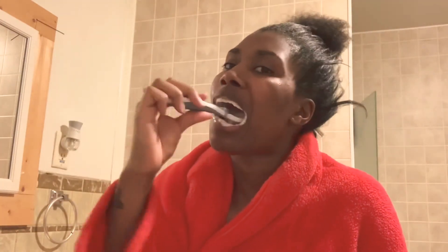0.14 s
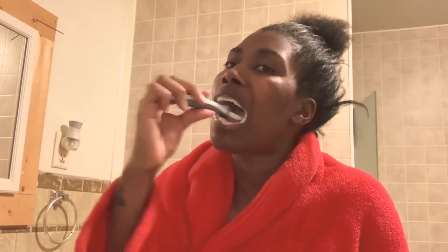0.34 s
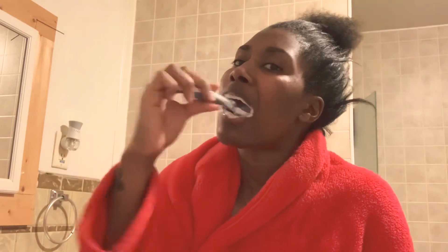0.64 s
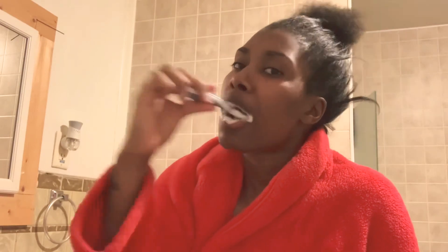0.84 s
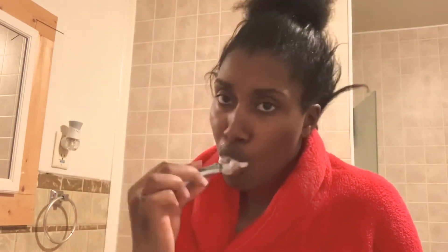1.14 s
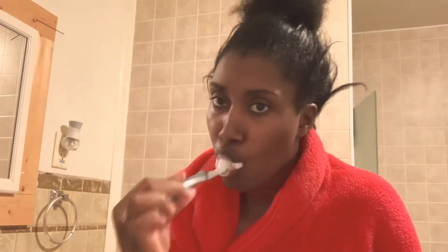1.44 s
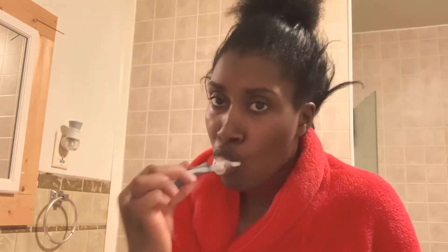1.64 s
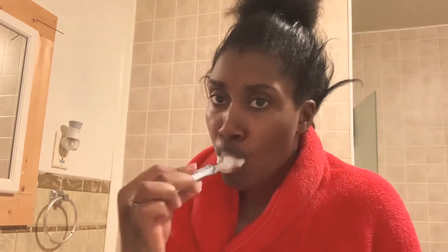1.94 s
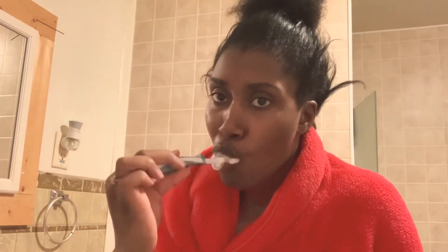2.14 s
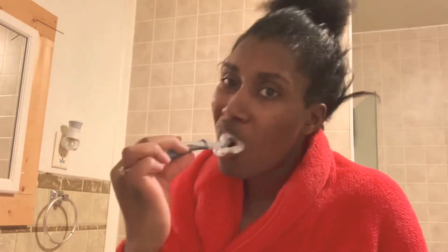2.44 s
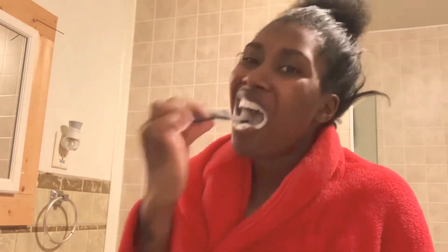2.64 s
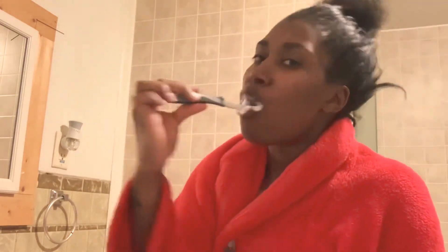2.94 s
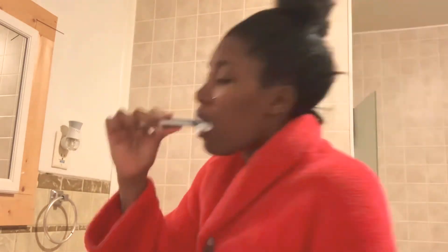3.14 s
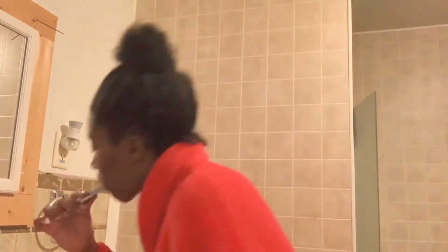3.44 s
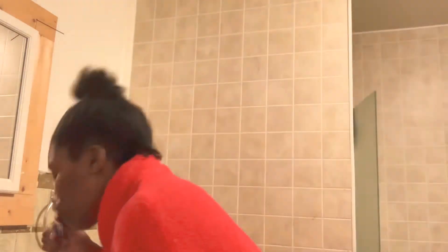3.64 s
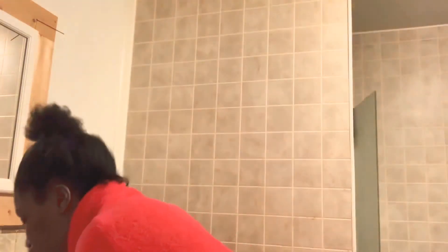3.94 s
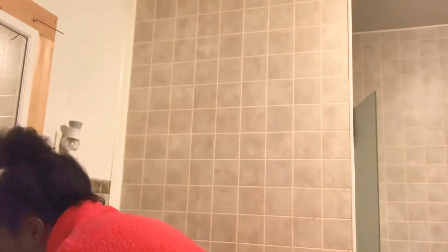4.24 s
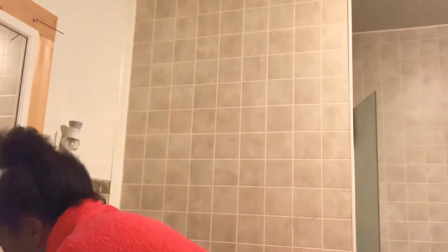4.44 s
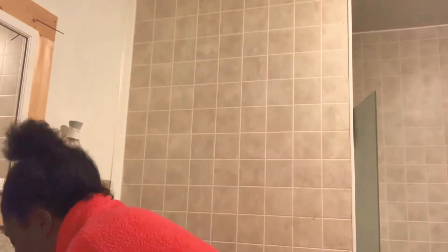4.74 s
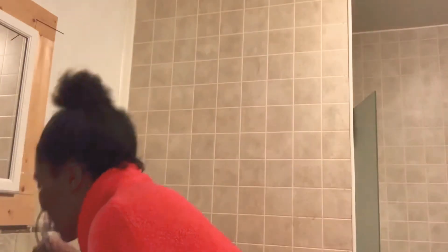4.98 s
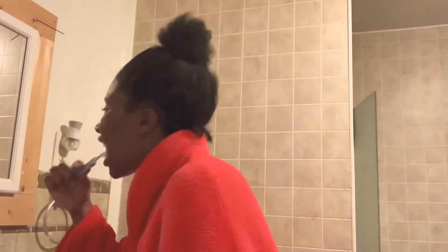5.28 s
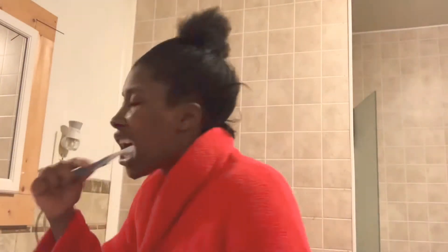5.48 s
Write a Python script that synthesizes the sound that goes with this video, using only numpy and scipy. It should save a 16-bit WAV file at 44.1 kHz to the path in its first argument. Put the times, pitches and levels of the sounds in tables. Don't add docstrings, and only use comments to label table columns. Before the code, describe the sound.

Short wet toothbrush bristle strokes hiss irregularly over a steady humming fan and rushing air in a small tiled bathroom.

```python
import sys
import numpy as np
from scipy import signal
from scipy.fft import rfft, irfft, next_fast_len
from scipy.io import wavfile
from scipy.ndimage import uniform_filter1d

SR = 44100
rng = np.random.default_rng(int(sys.argv[2]) if len(sys.argv) > 2 else 0)


def digitize_waveform(pressure):
    field = np.atleast_2d(pressure).T
    bounded = np.clip(field, -1, 1)
    quanta = np.round(bounded * 32767).astype(np.int16)
    wavfile.write(sys.argv[1], SR, quanta)


def ratio_of_db(decibels):
    return 10 ** (np.asarray(decibels, float) / 20)


N = 247401

HUM_HZ = 239.971
# multiple, left level/dB, right level/dB, left lead/rad
HUM_HARMONICS = [(1, -43.1, -56.1, -.81), (2, -33.1, -36.6, -.35), (3, -50.8, -53.8, -2.68),
                 (4, -58, -54.4, .33)]
# t/s, level/dB
HUM_DRIFT = [
    (0, 0.5),
    (1.5, 0.5),
    (2.7, 0),
    (3.5, 1.1),
    (4.1, 1),
    (5.61, 1.4),
]
# peak t/s, strength over calm/dB, length/s
GUSTS = [(.08, 7, 0.23), (.4, 5, 0.047), (.69, 6, 0.21), (.9, 0, 0.22), (1.234, 7, 0.15), (1.45, 1, 0.19),
         (1.922, 7, 0.16), (2.17, 6, 0.083), (2.45, 2, 0.22), (2.83, 2, 0.072), (3.093, 8.5, 0.21),
         (3.37, 6, 0.055), (3.558, 7, .08), (3.77, 3, 0.088), (4.0, 1.5, 0.17), (4.27, 3, .12),
         (4.53, 2, 0.06), (4.95, -1, .2), (5.258, 3, .15), (5.46, 4, .15)]
# f/Hz, width/Hz, left density/(dB per Hz), right density/(dB per Hz), left lead/rad
ROOM_MODES = [(58, 5, -73, -77, 0), (96, 10, -57, -62.5, 0), (118, 14, -60, -65, 0), (150, 10, -63, -68, 0),
              (182, 10, -64, -68, 0), (296, 30, -67, -68.5, -.3), (355, 16, -66.5, -67.5, -.6),
              (440, 9, -65, -65, 0), (538, 11, -63, -64, -.7),
              (598, 7, -56, -62, -.8), (620, 10, -61, -67, -.6), (667, 8, -64, -59.5, .6),
              (700, 6, -63, -68, -.4), (748, 10, -64, -67, .1), (813, 6, -68, -62, -.1),
              (904, 14, -69, -62.5, -2.2), (991, 20, -66, -63, 2.8), (1061, 25, -64.5, -66, -1.8),
              (1105, 30, -63.5, -69, -.2), (1192, 22, -66, -65, 1.),
              (1278, 20, -68, -69, -.5), (1389, 45, -66, -67, -1.6), (1491, 25, -69, -63.5, -2.4),
                 (1548, 16, -69, -66, -1.2), (1631, 22, -68.5, -68, 0), (1700, 45, -68.5, -67, -1),
                 (1819, 16, -65, -60.5, 1.8), (1976, 29, -70, -70, -1), (2229, 11, -62.5, -64.5, -3.),
                 (2355, 20, -69, -68.5, -.3), (2590, 40, -71, -71, -2.8), (1430, 30, -67, -68, -.5),
                 (1755, 30, -68, -68, -.3), (3230, 30, -72, -72, 0)]
# f/Hz, density/(dB per Hz)
RUSH = [(45, -69), (95, -82), (170, -75.5), (230, -71.5), (450, -68), (800, -70), (1700, -73.5),
        (2300, -72.5), (3200, -75.5), (5000, -80.5), (7000, -81.5), (11000, -82.5),
        (13000, -81), (14500, -80), (15800, -81)]
# f/Hz, correlation (-1..1)
RUSH_CORRELATION = [(40, 0.9), (100, 1), (400, 0.48), (700, 0.97), (1000, -0.59), (2000, -0.32),
                    (3000, -0.36), (5000, 0.0018), (12000, 0.037)]
# f/Hz, left minus right/dB
RUSH_PAN = [(40, 3), (250, 1), (600, 6), (1400, -3), (4000, 1), (9000, -0.1), (15000, 1)]
RUSH_GUST_SHARE = 0.027
# t/s, peak level/dB, length/s, dullness/dB
SCRUBS = [(0.068, -23, 0.052, 0), (0.128, -27, 0.038, 6), (0.368, -30, 0.022, -3), (0.616, -30.5, 0.047, 8),
          (0.741, -34, 0.033, -8), (0.812, -22.5, 0.029, -6), (1.203, -23.5, 0.03, 4),
          (1.282, -24.5, 0.04, 11), (1.708, -24.5, 0.046, 5), (1.906, -32, 0.033, 0.0),
          (1.958, -41, 0.033, -4), (2.137, -41, 0.027, -4), (2.256, -36, 0.03, -3),
          (2.5323, -19.5, 0.038, 1), (2.847, -31, 0.032, 13), (2.923, -33, 0.03, 5),
          (3.066, -22, 0.051, -5), (3.551, -31.5, 0.037, 9), (4.1455, -21, 0.037, -8),
          (4.2454, -22, 0.031, 0), (4.34, -35, 0.036, 1), (4.493, -26.5, 0.02, 2), (4.7546, -18, 0.039, 3),
          (5.109, -28.5, 0.029, 7), (5.275, -28.5, 0.03, 5), (5.3086, -15.5, 0.043, 4.5)]
# f/Hz, density/(dB per Hz)
BRISTLE = [(800, -25), (1900, -5.5), (2600, -4.5), (3500, 0), (4600, 1), (5800, -3), (8000, -3),
           (13000, -4), (15700, -10)]
FIZZ_DB, FIZZ_LOSS_PER_DULL_DB = -3, 3.5
MOUTH_HZ, MOUTH_DROP_HZ_PER_DULL_DB = 4840, 28
# f/Hz, t60/s
TILES = [(500, 0.95), (2000, 0.35), (4000, 0.29), (8000, 0.21), (15000, 0.37)]
# f/Hz, level/dB
BASS_CUT = [(20, -38), (36, -26), (48, -11), (70, -5), (90, 0)]
# f/Hz, level/dB
CENTRE_LOSS = [(11000, -0.5), (13000, -1.5), (14000, -5), (15000, -2)]
CENTRE_EDGE_HZ, EDGE_FLUTTER_HZ = 15000, 450


def evened(x):
    return x / np.sqrt(np.mean(x ** 2) + 1e-20)


def smooth_noise(shape, *widths):
    x = rng.standard_normal(shape)
    for width in widths:
        x = uniform_filter1d(x, size=width)
    return evened(x)


def read(points, hz):
    f, value = np.transpose(points)
    return np.interp(np.log(hz + 1), np.log(f + 1), value)


def white(size):
    return rfft(rng.standard_normal(size)) * np.sqrt(SR / 2)


def hum(waver_db=0.52, waver_rad=0.16, waver_hz=1.41):
    t = np.arange(N) / SR
    beat = np.sin(2 * np.pi * waver_hz * t + 0.43)
    out = np.zeros((2, N))
    for k, left_db, right_db, lead_rad in HUM_HARMONICS:
        phase = k * (2 * np.pi * HUM_HZ * t + waver_rad * beat / 2)
        peak = np.sqrt(2) * ratio_of_db(np.array([[left_db], [right_db]]))
        out += peak * np.cos(phase + np.array([[lead_rad], [0]]))
    return out * ratio_of_db(waver_db * beat) * ratio_of_db(np.interp(t, *np.transpose(HUM_DRIFT)))


def gust_gain(share):
    peak_s, rise_db, length_s = np.transpose(GUSTS)
    t = np.arange(0, N + 256, 256) / SR
    bumps = np.exp(-((t[:, None] - peak_s) / length_s * 2) ** 2)
    level_db = share * (rise_db * bumps).sum(axis=1)
    return ratio_of_db(np.interp(np.arange(N) / SR, t, level_db - level_db.mean()))


def modes(steady_s=0.093, upper_db=-1.):
    size = next_fast_len(N)
    hz = np.fft.rfftfreq(size, 1 / SR)[:size // 10]
    spectra = np.zeros((2, 2, size // 2 + 1), complex)
    for f, width_hz, left_db, right_db, lead_rad in ROOM_MODES:
        re, im = rng.standard_normal((2, len(hz))) * np.sqrt(size * SR / 4)
        ring = (re + 1j * im) / (1 + (2 * (hz - f) / width_hz) ** 2 * (np.sqrt(2) - 1))
        sides = np.array([[ratio_of_db(left_db) * np.exp(1j * lead_rad)], [ratio_of_db(right_db)]])
        is_rumble = int(70 < f < 135)
        spectra[is_rumble, :, :len(hz)] += ring * sides
    upper, rumble = irfft(spectra, size)[..., :N]
    power = uniform_filter1d(rumble[0] ** 2, size=round(steady_s * SR))
    steady_rumble = rumble / np.sqrt(power / power.mean() + .1)
    return ratio_of_db(upper_db) * upper + gust_gain(1) * steady_rumble


def rush(ripple_db=1.0, flicker_db=1.14):
    size = next_fast_len(N)
    hz = np.fft.rfftfreq(size, 1 / SR)
    same = np.clip(read(RUSH_CORRELATION, hz), -1, 1)
    left = white(size)
    pair = np.array([left, same * left + np.sqrt(1 - same ** 2) * white(size)])
    ripple = smooth_noise(pair.shape, 350, 150) * np.clip(hz / 3600, 0, 1) ** 2
    flicker = smooth_noise(N, 1500, 1500)
    pan_db = np.array([[.5], [-.5]]) * read(RUSH_PAN, hz)
    colour_db = read(RUSH, hz) + pan_db + ripple_db * ripple
    air = irfft(pair * ratio_of_db(colour_db), size)[:, :N]
    return gust_gain(RUSH_GUST_SHARE) * ratio_of_db(flicker_db * flicker) * air


def scrubs(grain_db=2.5, clump_db=2.5, rise=0.43, trim_db=-9, mouth_db=3.5, mouth_width_hz=570.0,
           uneven_db=1.7, shared=0.26):
    size = 8192
    out = np.zeros((2, N + size))
    hz, t = np.fft.rfftfreq(size, 1 / SR), np.arange(size) / SR
    for start_s, peak_db, length_s, dull_db in SCRUBS:
        common, left, right, clumps = rng.standard_normal((4, size))
        grain = np.minimum(rng.exponential(1, size), 4)
        force_db = grain_db * grain + clump_db * evened(uniform_filter1d(clumps, size=90))
        slips = (np.array([left, right]) + shared * common) * ratio_of_db(force_db)

        fizz_db = FIZZ_DB - FIZZ_LOSS_PER_DULL_DB * max(dull_db - 5, 0)
        tilt = [(2500, dull_db), (4500, 0.0088), (6000, 0.0092), (10000, fizz_db)]
        mouth_hz = MOUTH_HZ - MOUTH_DROP_HZ_PER_DULL_DB * dull_db
        colour_db = read(BRISTLE, hz) + read(tilt, hz)
        colour_db += mouth_db / (1 + (2 * (hz - mouth_hz) / mouth_width_hz) ** 2)
        colour_db += uneven_db * evened(uniform_filter1d(clumps[:len(hz)], size=70))

        u = t / max(length_s, .005)
        attack = np.sin(np.pi / 2 * np.minimum(u / rise, 1)) ** 1.2
        decay = np.exp(-np.maximum(u - rise, 0) ** 1.64 * 2.37)
        hiss = evened(irfft(rfft(slips) * ratio_of_db(colour_db), size)) * attack * decay
        at = max(round((start_s - .008) * SR), 0)
        out[:, at:at + size] += ratio_of_db(peak_db + trim_db) * hiss
    return out[:, :N]


def tiles(x):
    taps = np.zeros((2, SR // 2))
    at = np.arange(200, SR // 2 - 20, 20) + rng.integers(0, 20, (2, (SR // 2 - 201) // 20))
    np.put_along_axis(taps, at, rng.choice([-1., 1.], at.shape), 1)
    hz, t, z = signal.stft(taps, SR, nperseg=256)
    decay = ratio_of_db(-60 * t / read(TILES, hz)[:, None])
    tail = signal.istft(z * decay, SR, nperseg=256)[1]
    return signal.fftconvolve(x, tail / np.linalg.norm(tail[0]), axes=1)[:, :N]


def scene():
    fan = hum() + modes() + rush()
    brush = scrubs()
    return fan + brush + ratio_of_db(-1.5) * tiles(brush)


def band_limit(x):
    return signal.sosfilt(signal.butter(12, 15770, fs=SR, output="sos"), x)


def record(dry):
    size = next_fast_len(N)
    bass_gain = ratio_of_db(read(BASS_CUT, np.fft.rfftfreq(size, 1 / SR)))
    left, right = irfft(rfft(dry, size) * bass_gain, size)
    hz, t, z = signal.stft((left + right) / 2, SR, nperseg=1024, noverlap=768)
    flutter = np.repeat(rng.standard_normal(len(t)), 4)[:len(t)]
    edge_hz = CENTRE_EDGE_HZ + EDGE_FLUTTER_HZ * flutter
    z = z * ratio_of_db(read(CENTRE_LOSS, hz))[:, None] * (hz[:, None] < edge_hz)
    mid = signal.istft(z, SR, nperseg=1024, noverlap=768)[1][:N]
    side = (left - right)[:N] / 2
    return band_limit(np.array([mid + side, mid - side]))


dry = scene()
out = record(dry)
digitize_waveform(out)
```